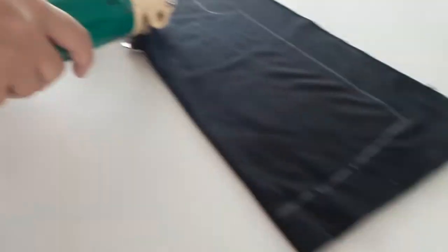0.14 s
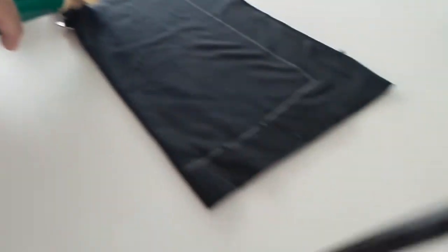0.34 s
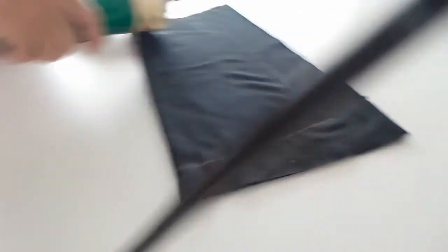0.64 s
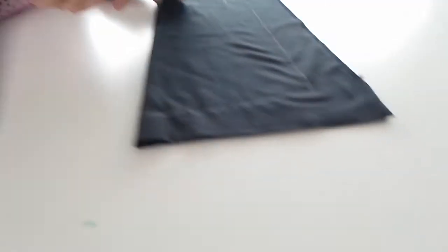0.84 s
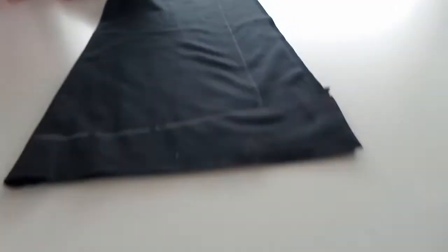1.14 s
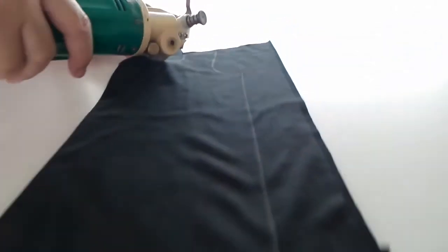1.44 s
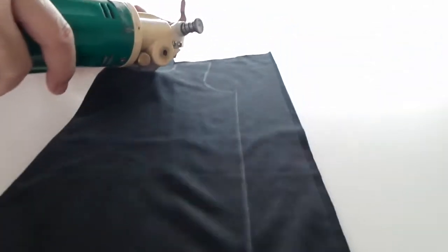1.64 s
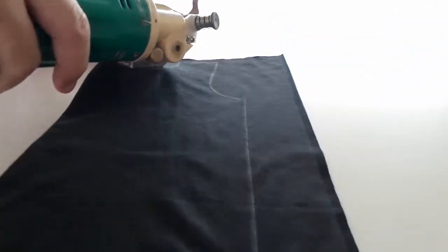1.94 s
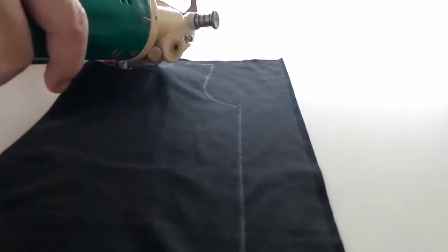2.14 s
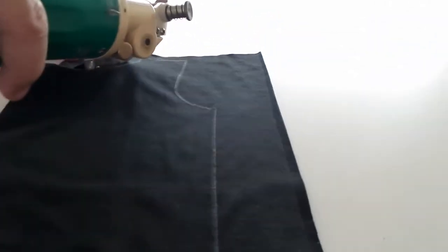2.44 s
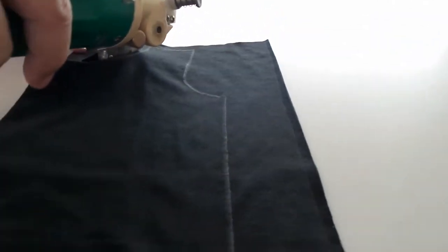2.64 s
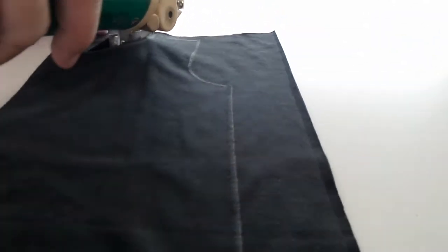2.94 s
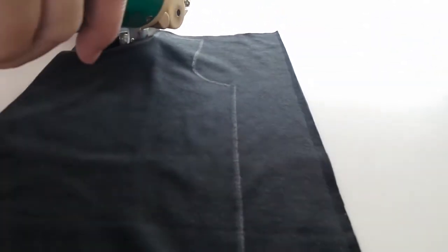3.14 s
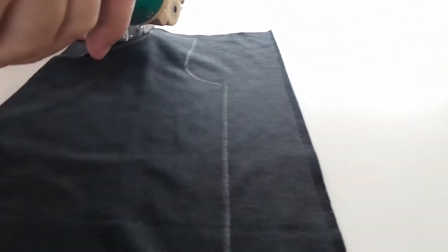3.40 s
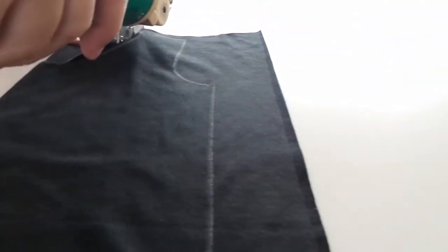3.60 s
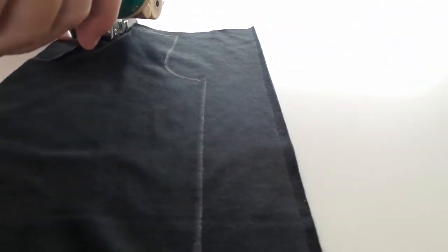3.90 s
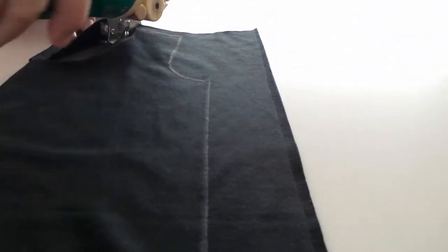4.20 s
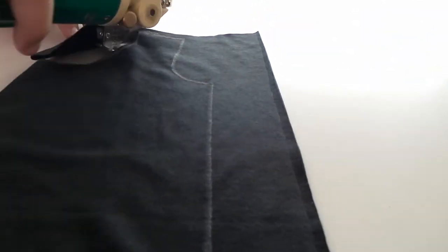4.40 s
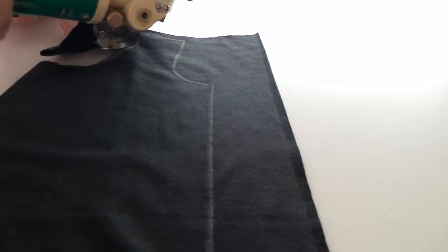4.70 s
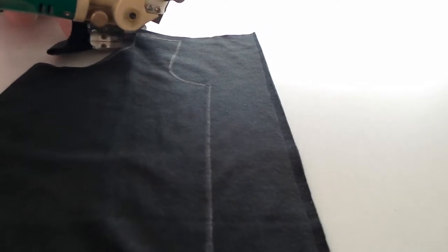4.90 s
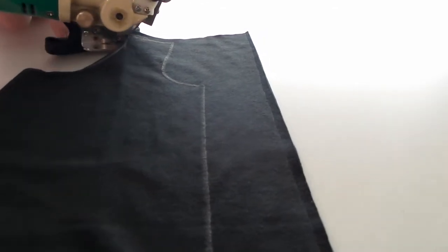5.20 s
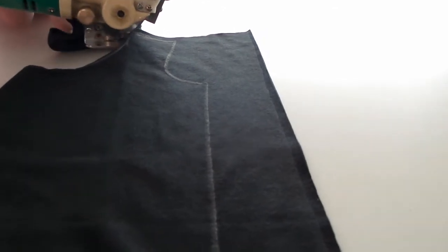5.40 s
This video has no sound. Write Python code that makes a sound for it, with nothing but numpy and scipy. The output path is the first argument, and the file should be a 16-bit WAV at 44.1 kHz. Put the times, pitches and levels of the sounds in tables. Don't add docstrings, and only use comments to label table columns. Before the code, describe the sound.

Close up in a small workroom, a mains-powered round-blade fabric cutter is already running, a harsh hum with dense metallic chatter. It holds nearly constant speed, its brightness shifting slightly as it is handled. After about four seconds the power cuts, the blade drops in pitch and catches to a stop. Sharp metal clicks follow over faint rumble and hiss, picked up by a small stereo recorder.

```python
import sys
import numpy as np
from scipy import signal
from scipy.fft import rfft, irfft
from scipy.io import wavfile

SR = 44100
rng = np.random.default_rng(int(sys.argv[2]) if len(sys.argv) > 2 else 0)


def amplitude_ratio(level_db):
    exponent = np.asarray(level_db, float) / 20
    return 10 ** exponent


def wav_out(sig):
    wavfile.write(sys.argv[1], SR, np.round(np.clip(np.atleast_2d(sig).T, -1, 1) * 32767).astype(np.int16))


N = 244755

GEAR_RATIO = 5
RUNNING_SPEED = 124
POWER_OFF_S = 4.238
# time in seconds, load in dB, gear case turned to the listener (-1..1).
HOLD = [(0, -3.5, -.2), (.3, -4.5, 0.44), (.62, -4, 0.29), (.88, -5, -0.74), (1.3, -2.5, -0.52),
        (1.9, -0.5, -0.15), (2.5, -1, -0.037), (3.05, -1, -0.57), (3.5, -3.5, -0.26), (4.2, -3.5, 0.33)]
# frequency in Hz, left minus right in dB.
TILT = [(60, -11.5), (110, -15), (200, 1), (380, -11), (700, 0.5), (1290, 0.5), (2380, -11.5), (4400, -1),
        (8120, 9.5), (15000, 5.5)]


def rms_one(x):
    return x / np.sqrt(np.mean(x ** 2) + 1e-20)


def in_time(rows):
    s, *columns = np.transpose(rows)
    return [np.interp(np.arange(N) / SR, s, c) for c in columns]


def ramp(start_s, length_s):
    return np.clip((np.arange(N) / SR - start_s) / length_s, 0, 1)


def since(start_s):
    return np.maximum(np.arange(N) / SR - start_s, 0)


def rfft_hz():
    return np.arange(2049) * SR / 4096


def colour(x, points, share=1, rings=()):
    hz, db = np.transpose(points)
    grid = rfft_hz()
    gain_db = np.interp(np.log(np.maximum(grid, 1)), np.log(hz), share * db)
    gain_db += sum(top_db / (1 + (2 * (grid - ring_hz) / width) ** 2) for ring_hz, width, top_db in rings)
    folded = irfft(gain_db * np.log(10) / 20)
    folded[1:2048] *= 2
    folded[2049:] = 0
    response = irfft(np.exp(rfft(folded)))[None, :1500]
    return signal.oaconvolve(np.atleast_2d(x), response, axes=1)[:, :N]


def resonate(x, hz, width):
    r = np.exp(-np.pi * width / SR)
    poles = [1, -2 * r * np.cos(2 * np.pi * hz / SR), r * r]
    return signal.lfilter([(1 - r * r) / 2, 0, (r * r - 1) / 2], poles, x)


def band(x, low_hz, high_hz, order=2):
    return signal.sosfilt(signal.butter(order, [low_hz, high_hz], "band", fs=SR, output="sos"), x)


def drift(rate):
    return rms_one(band(rng.standard_normal(N), max(rate / 10, 2), rate, order=1))


def armature():
    # time in seconds, armature turns per second.
    held_speed = [(0.0, 124.55), (0.25, 123.09), (0.5, 123.84), (0.75, 123.78), (1.0, 124.17),
                  (1.25, 124.17), (1.5, 124.09), (1.75, 123.72), (2.0, 123.52), (2.25, 123.88),
                  (2.5, 124.62), (2.75, 123.96), (3.0, 123.95), (3.25, 124.36), (3.5, 124.43),
                  (3.75, 124.34), (4.0, 125.1), (4.24, 126.2)]
    drop, drop_s, friction = 4.5, 0.014, 330
    age = since(POWER_OFF_S)
    lost = drop * (1 - np.exp(-age / drop_s)) + friction * age
    return np.cumsum(np.maximum(in_time(held_speed)[0] - lost, 1)) / SR


def hum(turns):
    # armature order, ripple multiple, level in dB, polarity.
    hum_lines = [(2, 1, -11, 1), (3, 0, -1, 1), (4, -1, -11, -1), (6, -2, -10, 1), (1, 3, -10, 1),
                 (7, -1, -10, -1), (5, -1, -4, 1), (4, 0, -3, -1), (3, 1, 8, 1), (2, 2, -1, 1),
                 (7, -2, -3, 1), (6, -1, 6, -1), (5, 0, 13, 1), (4, 1, 5, 1), (3, 2, 9, 1), (2, 3, 0, 1),
                 (6, 0, -5, -1), (5, 1, 6, 1), (4, 2, -3, -1), (3, 3, -2, 1), (2, 4, -4, 1), (7, 0, -4, 1),
                 (6, 1, -4, 1), (5, 2, -7, -1), (7, 1, -5, 1), (6, 2, -8, 1), (5, 3, -7, 1),
                 (9, -1, -8, -1), (11, -2, -8, 1), (10, -1, -3, -1), (9, 0, -1, 1), (8, 1, -1, 1),
                 (10, 0, -5, 1), (12, -1, -4, 1), (11, 0, -6, 1), (10, 1, 1, -1), (9, 2, -2, -1),
                 (14, -1, -7, 1), (1, 4, -10, 1), (4, 3, -9, -1), (8, 3, -3, 1), (11, 2, -6, -1)]
    # order of the blade turn, level in dB.
    shaft_lines = [(5, -73), (6, -64), (10, -71), (11, -66), (12, -58.5), (13, -60.5), (18, -56)]
    # frequency in Hz, density in dB per Hz.
    whirr_colour = [(30, -45), (60, -23), (110, 3), (160, -9.5), (200, -8.5), (300, -7), (600, 7),
                    (1400, -17.5)]
    ripple_hz, ripple_start, waver_db, lead_samples = 120.045, .145, .6, 8
    t = np.arange(N) / SR
    ripple = ripple_hz * t + ripple_start
    lines = 0
    for order, multiple, db, sign in hum_lines:
        level = amplitude_ratio(db + waver_db * drift(5.0))
        lines = lines + sign * level * np.cos(2 * np.pi * (order * turns + multiple * ripple))
    shaft, shaft_fade_db = 0, 4.5 * since(1.74)
    for order, db in shaft_lines:
        phase = 2 * np.pi * order * turns / GEAR_RATIO + order
        shaft = shaft + amplitude_ratio(db + 8.5 - shaft_fade_db) * np.cos(phase)
    current = amplitude_ratio(-2500 * np.clip(t - POWER_OFF_S, 0, .04))
    hum_db = -25 + in_time(HOLD)[0]
    steady = current * (amplitude_ratio(hum_db) * rms_one(lines) + shaft)

    whirr_db = -41 - 4 * since(2.3)
    slowing = np.gradient(turns) * SR / RUNNING_SPEED
    both, apart = rms_one(colour(rng.standard_normal((2, N)), whirr_colour))
    whirr = amplitude_ratio(whirr_db) * slowing * (both + amplitude_ratio(-8.5) * apart * [[1], [-1]])
    return np.vstack([steady, np.roll(steady, lead_samples)]) + whirr


def singing(drive, hz, width):
    shaken = drive * (rng.standard_normal((3, N)) + 1j * rng.standard_normal((3, N)))
    r = np.exp(-np.pi * width / SR)
    turning_tone = np.exp(2j * np.pi * np.cumsum(hz) / SR)
    return rms_one((signal.lfilter([1], [1, -r], shaken) * turning_tone).real)


def gears(turns):
    # place in armature turns, blade plate in dB, low case in dB,
    # high case in dB, guard in dB.
    contacts = [(0.0, 10, 2, 0, 2), (.3, 2, 8, -4, 7), (.72, 8, 3, -2, 3), (1.12, -2, 6, -4, 2),
                (1.42, -8, 5, 0, 3), (1.6, 0, -8, -4, -4), (1.9, -3, -8, -8, 7), (2.12, -8, -8, -6, 4),
                (2.36, -1, -6, -8, 1), (2.45, -9, 7, 2, -6), (2.84, -2, -5, -3, 3), (3.22, -2, -1, -8, -1),
                (3.42, -9, 5, 0, 3), (3.72, -6, 3, -2, -6), (4.06, 4, -9, -9, -9), (4.42, -3, 8, 0, 0),
                (4.6, -4, 4, -2, -2), (4.8, 6, -9, -3, 1), (4.92, 6, 8, -2, 3)]
    # level in dB, share of load, dB per unit of turning.
    part_rules = [(-23, 0.11, -0.7), (-25.5, 0.34, -2), (-24, 0.24, 1), (-29.5, 0.035, 0.4)]
    # low edge in Hz, high edge in Hz.
    part_edges = [(560, 2847), (2550, 3570), (3600, 4930), (5400, 19800)]
    burst_s = [0.0014, 0.0011, 0.001, 0.0012]
    scatter_db = [-3, 1, 2, 3]
    rub_db = [4, -1, 3, 4]
    part_trim_db = [0.19, 5.25, 4.68, 5.84]
    speed_power = [0.57, 1.01, 0.93, 0.74]
    # frequency in Hz, width in Hz, Hz per unit of turning.
    singing_modes = [(1797, 173, 40), (3010, 117, -0.5), (4987, 190, 60.5), (6145, 190, 30)]
    # time in seconds, plate, low case, high case, guard in dB.
    facing = [(0, -33.5, -30, -28.5, -40), (.25, -33, -29.5, -28.5, -40), (.5, -36, -27.5, -30, -32.5),
              (.7, -32.5, -30, -36, -31), (.85, -33, -31, -33, -65), (1.1, -28.5, -30.5, -34.5, -34),
              (1.3, -30.5, -29, -35, -41), (1.65, -29.5, -31, -28, -37), (2.0, -31, -31, -31, -35),
              (2.3, -31.5, -25.5, -35, -34), (2.7, -32.5, -34.5, -34, -36), (3.05, -30.5, -33, -33, -36),
              (3.4, -35, -34, -56, -69), (3.8, -36.5, -37, -37, -52.5), (4.2, -41, -30, -33, -48),
              (4.5, -34.5, -26, -39, -37)]
    # time in seconds, Hz above rest.
    grip = [(0, -70), (.25, -30), (.5, 110), (.8, 30), (1.1, 110), (1.3, -20), (2.8, -35), (3.5, 0),
            (4.1, 90)]
    # frequency in Hz, density in dB per Hz.
    housing = [(200, -60.5), (600, -20.5), (1000, -13.5), (1400, -12), (1700, -9.5), (2500, 2.5), (3200, 4),
               (5000, -3.5), (6300, -10), (7000, -21.5), (8600, -24.5), (9500, -33.5), (12500, -26),
               (14300, -64), (16000, -27)]
    # frequency in Hz, width in Hz, height in dB.
    housing_rings = [(700, 200, 4), (1800, 160, 2.5), (2340, 120, 3), (2960, 200, 3), (3480, 150, 3),
                     (4470, 190, 4), (6230, 200, 1.5), (8450, 300, 4), (11650, 300, 7), (15700, 250, 20)]
    # frequency in Hz, width in Hz, level in dB.
    guard_modes = [(8410, 320, -43), (11630, 70, -46.5)]
    # time in seconds, level in dB.
    guard_facing = [(0, -1), (.7, -8), (.9, 0.5), (1.5, 1.5), (2.0, -2), (2.5, -9), (3.2, -7), (4.2, -10),
                    (4.4, -10), (4.52, 0.5)]
    # time in seconds, dB above the chatter.
    catch_rows = [
        (4.481, 9),
        (4.528, 14),
        (4.536, 17),
        (4.566, 2),
        (4.573, 10),
    ]

    place, *strength_db = np.transpose(contacts)
    blade_turns = np.arange(turns[-1] // GEAR_RATIO + 1)
    when = (GEAR_RATIO * blade_turns[:, None] + place).ravel()
    luck = rng.standard_normal((len(when), 5))
    when = when + 0.024 * luck[:, 4]
    at = np.minimum(np.searchsorted(turns, when), N - 1)
    white = rng.standard_normal((3, N))
    catches = np.full(N, 1e-18)
    catches[[round(s * SR) for s, _ in catch_rows]] = [amplitude_ratio(db) for _, db in catch_rows]

    load_db, turned = in_time(HOLD)
    facing_db, grip_hz = in_time(facing), in_time(grip)[0]
    slowing = np.gradient(turns) * SR / RUNNING_SPEED
    wander = drift(30)
    throb_db = 3.5 * np.cos(2 * np.pi * (turns - .45))
    out = 0
    for k, (db, share, turn_db) in enumerate(part_rules):
        level_db = db + share * load_db + turn_db * turned
        if k == 3:
            level_db = level_db - ramp(3.19, 0.36)
        blows = np.zeros(N)
        blows[at] = amplitude_ratio(np.resize(strength_db[k], len(at)) + luck[:, k]) * (when < turns[-1])
        decay = np.exp(-1 / (burst_s[k] * SR))
        bursts, caught = signal.lfilter([1], [1, -decay], [blows + 1e-18, catches])
        bursts = rms_one(bursts) + caught
        rub = amplitude_ratio(rub_db[k] + 1.6 * wander + throb_db) * slowing ** .4
        drive = np.hypot(bursts * amplitude_ratio([[0], [-2], [-2]]), rub)
        spread = amplitude_ratio([[0], [scatter_db[k]], [scatter_db[k]]])
        rung = colour(drive * white * spread, housing, rings=housing_rings)
        hz, width, swing_hz = singing_modes[k]
        mode_hz = hz + swing_hz * turned
        if k == 1:
            mode_hz = mode_hz + grip_hz
        fade = slowing ** speed_power[k]
        out = out + amplitude_ratio(facing_db[k] - 0.5) * fade * singing(drive, mode_hz, width)
        low_hz, high_hz = part_edges[k]
        out = out + amplitude_ratio(level_db + part_trim_db[k]) * fade * rms_one(band(rung, low_hz, high_hz))
    for hz, width, db in guard_modes:
        level = amplitude_ratio(db + in_time(guard_facing)[0])
        out = out + level * slowing * singing(drive, np.full(N, hz), width)
    return out


def worm_tooth(turns):
    # time in seconds, level in dB, spread of ring pitch from blow to blow.
    pressure = [(0, -36, .045), (.16, -34, 0.043), (.25, -25.5, 0.023), (.45, -27, 0.037), (.7, -28, 0.041),
                (.85, -58, 0.06), (1.9, -34.5, 0.071), (2.6, -31, 0.06), (3.05, -32.5, 0.03),
                (3.3, -29.5, 0.01), (3.9, -30, 0.012), (4.2, -33.5, .02)]
    place, rise_s, phase_spread = 0.34, 0.0019, .18
    slowing = np.gradient(turns) * SR / RUNNING_SPEED
    ring_hz = 4606 - 860 * (1 - ramp(0, 0.76)) - 806 * (1 - slowing)
    level_db, pitch_spread = in_time(pressure)
    level_db = level_db - 211.5 * since(4.41)
    count = np.floor(turns + 1 - place).astype(int)
    struck = np.searchsorted(count, count)
    age = np.minimum((np.arange(N) - struck) / SR, .05)
    luck = rng.standard_normal((count[-1] + 1, 3))[count].T
    shape = age / rise_s * np.exp(1 - age / rise_s * 2)
    blow_hz = ring_hz * (1 + pitch_spread[struck] * luck[1])
    swing = np.sin(2 * np.pi * (blow_hz * age + phase_spread * luck[2]))
    return amplitude_ratio(level_db + 24.0 + 0.19 * luck[0]) * shape * swing


def anvil(turns):
    # place in armature turns, frequency in Hz, width in Hz, level in dB.
    plate_modes = [(4.74, 1100, 400, -48), (4.95, 1790, 250, -38), (.74, 2000, 250, -40),
                   (.28, 2950, 350, -38)]
    speed = np.gradient(turns) * SR
    load_db = in_time(HOLD)[0]
    out = 0
    for place, hz, width, db in plate_modes:
        passing = np.diff(np.floor((turns - place) / GEAR_RATIO), prepend=0) > 0
        strikes = passing * amplitude_ratio(2 * rng.standard_normal(N))
        blows = np.convolve(strikes, np.hanning(30), "same") * rng.standard_normal(N)
        blows = blows * (speed / speed[0]) ** 3
        rung = resonate(resonate(blows + 1e-18, hz, width), hz, 2 * width)
        out = out + amplitude_ratio(db + 1.5 * load_db) * rms_one(rung)
    return out


def ports(x, pan_db):
    lead_samples = 4
    late = np.concatenate([np.zeros(lead_samples), x[:-lead_samples]])
    left = colour(x * amplitude_ratio(pan_db / 2), TILT, share=0.83)
    right = colour(late / amplitude_ratio(pan_db / 2), TILT, share=-0.36)
    return np.vstack([left, right])


def room(x):
    t60_s, level_db = .36, -19
    age = np.arange(SR // 4) / SR
    tail = rng.standard_normal((2, len(age))) * amplitude_ratio(-60 * age / t60_s) * (age > .004)
    tail = band(tail, 500, 7000, order=1)
    return amplitude_ratio(level_db) * signal.oaconvolve(x, tail / np.sqrt(np.sum(tail[0] ** 2)), axes=1)[:, :N]


def air():
    # frequency in Hz, density in dB per Hz.
    air_colour = [(18, -53), (30, -2), (141, -4), (221, -7), (266, -11), (303, -1), (374, -1), (473, -2.5),
                  (822, -19.5), (2900, -22), (9970, -40), (13000, -40), (14800, -37), (16000, -38)]
    # frequency in Hz, correlation (-1..1).
    likeness = [(60, 1), (240, 0.99), (950, -0.038), (3770, -0.031), (15000, -0.39)]
    # frequency in Hz, left minus right in dB.
    balance = [(60, 5), (110, -5), (200, 10), (380, -0.5), (700, -6), (1290, 0), (2380, -1.5),
               (4400, -13.5), (8120, 8), (15000, -11)]
    # frequency in Hz, width in Hz, level in dB.
    far_lines = [(112, 19, -67.5), (221, 24, -63), (316, 32, -68)]
    mid, side = rms_one(colour(rng.standard_normal((2, N)), air_colour))
    alike = [(hz, 10 * np.log10(1 + np.clip(c, -.9, .97))) for hz, c in likeness]
    apart = [(hz, 10 * np.log10(1 - np.clip(c, -.9, .97))) for hz, c in likeness]
    mid, side = colour(mid, alike)[0], colour(side, apart)[0]
    left = colour(mid + side, balance, share=0.025)
    right = colour(mid - side, balance, share=-0.63)
    pair = np.vstack([left, right])
    creep_s = since(4.94)
    rumble = amplitude_ratio(-51.5 + 7 * creep_s) * rms_one(band(pair, 25, 1260))
    hiss = amplitude_ratio(-49 + 11 * creep_s + 1.1 * drift(6.3)) * rms_one(band(pair, 723, 14000))
    far = 0
    for hz, width, db in far_lines:
        far = far + amplitude_ratio(db) * rms_one(resonate(resonate(rng.standard_normal(N), hz, width), hz, width))
    return rumble + hiss + far * amplitude_ratio(-3 + 13 * ramp(4.97, 0.39))


def clicks():
    # time in seconds, peak in dB, left minus right in dB, ring in Hz, table thud in dB.
    ticks = [
        (4.586, -24, -8.5, 2170, -40),
        (4.923, -16, -7, 3150, -36),
        (4.9275, -27, -7, 3150, -40),
        (4.9305, -30, -7, 3000, -40),
        (5.2737, -7, 8, 4280, -25.5),
        (5.339, -14, 9, 4000, -22),
        (5.3415, -21, 9, 4000, -30),
        (5.544, -11, 8, 4170, -24),
    ]
    # share of the ring frequency, level in dB, 60 dB decay in seconds.
    metal_modes = [(0.549, 1.5, 0.0042), (.74, -11, 0.035), (.86, -15, 0.013), (1.0, -2, 0.019),
                   (1.14, -1, 0.019), (1.35, 5.5, 0.0042), (1.75, -7, 0.0076), (2.1, -4, 0.0034),
                   (2.6, -14, 0.0038), (3.2, -11, 0.0032)]
    thud_hz, thud_t60_s, damping = 1075, 0.019, .42
    bounce_s, bounce_db = .0015, -4
    out = np.zeros((2, N))
    for s, db, pan_db, ring_hz, thud_db in ticks:
        at = round(s * SR)
        age = np.arange(min(N - at, SR // 10)) / SR
        thud = (1 - np.exp(-age / 0.0016)) * amplitude_ratio(-60 * age / thud_t60_s) * np.sin(2 * np.pi * thud_hz * age)
        tick = amplitude_ratio(thud_db + 12.0) * thud
        swell = 1 - np.exp(-age / 0.00018)
        for share, mode_db, t60 in metal_modes:
            level = amplitude_ratio(mode_db - 8.0 + rng.normal(0, 1.0))
            ring = np.sin(2 * np.pi * (share * ring_hz * age + rng.random()))
            tick += level * swell * amplitude_ratio(-60 * age / t60 / damping) * ring
        lag = round(bounce_s * SR)
        tick[lag:] += amplitude_ratio(bounce_db) * tick[:-lag]
        out[:, at:at + len(age)] += amplitude_ratio(db) * tick * amplitude_ratio([[pan_db / 2], [-pan_db / 2]])
    return out


def scene():
    turns = armature()
    pan_db = -3.5 + 0.5 * in_time(HOLD)[0] + 0.28 * since(0)
    direct, left, right = amplitude_ratio(0.5) * gears(turns)
    scatter = np.vstack([colour(left, TILT, share=0.47), colour(right, TILT, share=-0.012)])
    struck = direct + worm_tooth(turns) + anvil(turns)
    tool = band(ports(struck, pan_db) + scatter, 420, 19000, order=3)
    taps = clicks()
    duck_db = -9 * (1 - ramp(4.32, .2))
    return tool + taps + room(taps + amplitude_ratio(2) * tool) + hum(turns) + air() * amplitude_ratio(duck_db)


def low_pass(x):
    return signal.sosfilt(signal.butter(12, 16710, fs=SR, output="sos"), x)


def record(dry):
    # frequency in Hz, width in Hz, depth in dB.
    port_notches = [(9500, 680, -17), (10900, 1400, -14)]
    right = colour(dry[1], [(20, 0), (20000, 0)], rings=port_notches)
    pair = np.vstack([dry[0], right])
    rounded = .97 * np.tanh(pair / .97)
    thin = signal.lfilter(*signal.butter(3, 60, "high", fs=SR), rounded)
    top_cut = signal.cheby2(20, 60, 16000, fs=SR, output="sos")
    mix = signal.sosfilt(top_cut, thin)
    return low_pass(mix)


dry = scene()
out = record(dry)
wav_out(out)
```